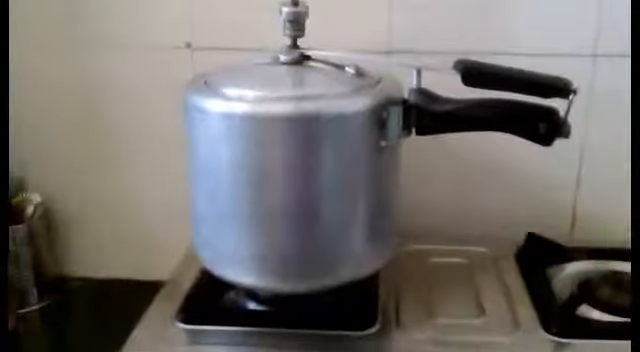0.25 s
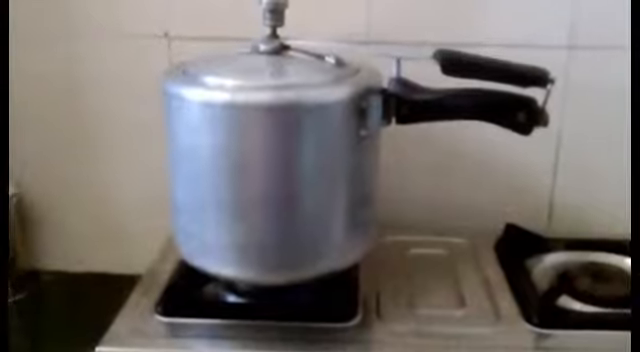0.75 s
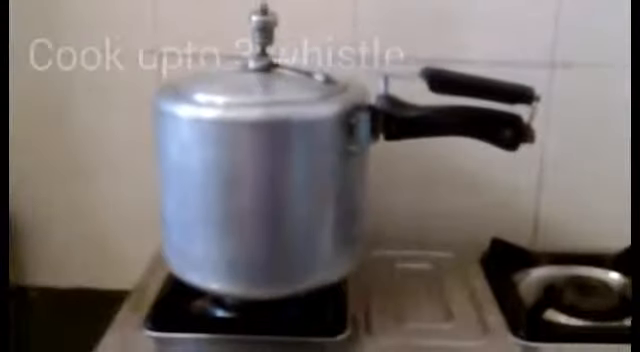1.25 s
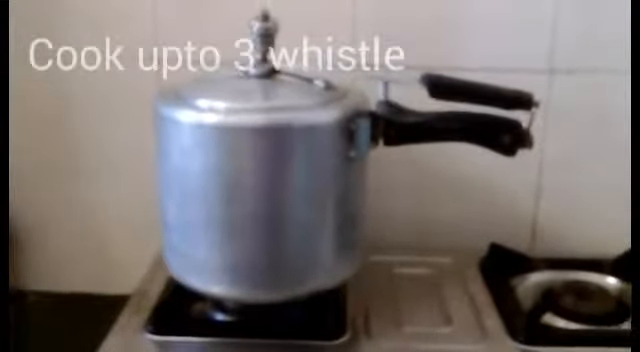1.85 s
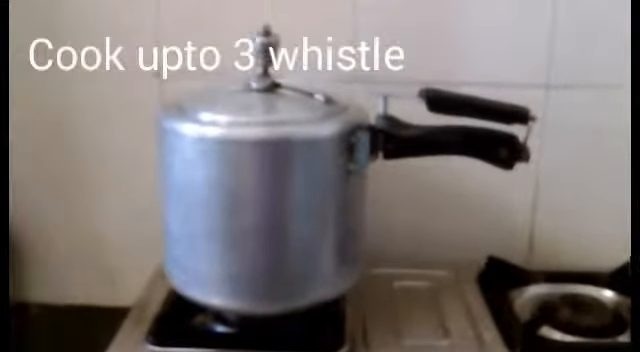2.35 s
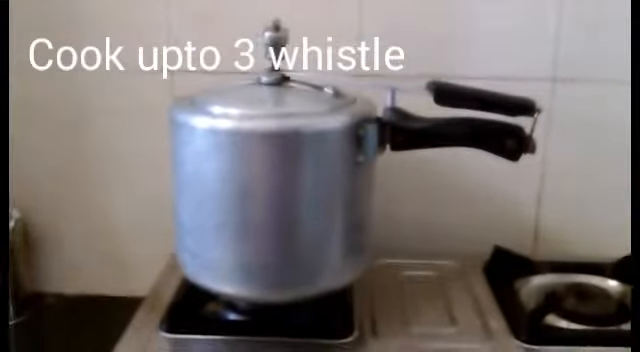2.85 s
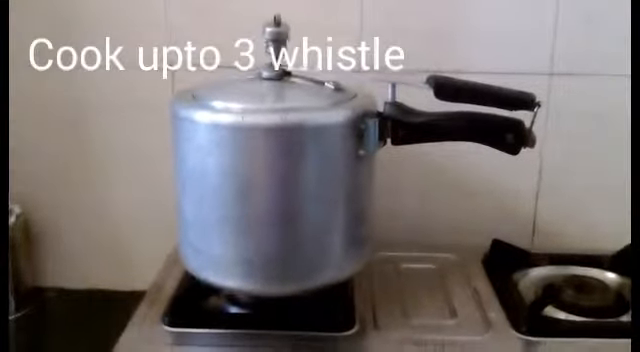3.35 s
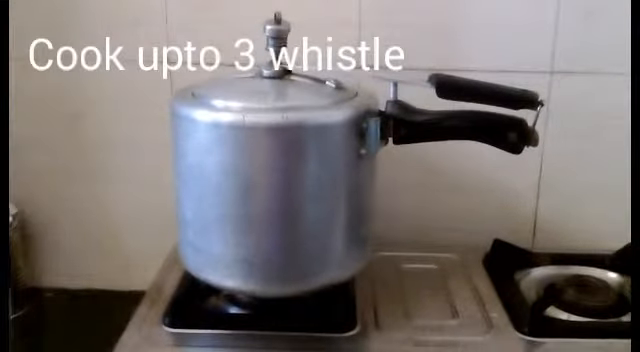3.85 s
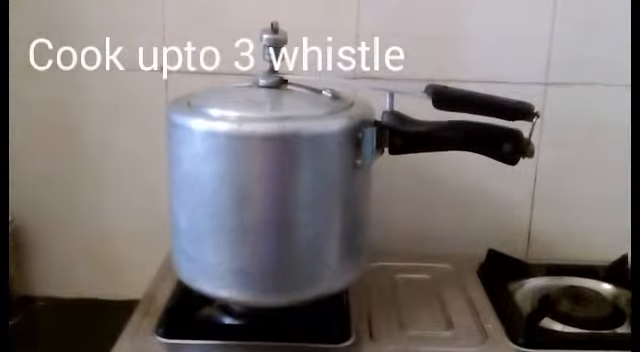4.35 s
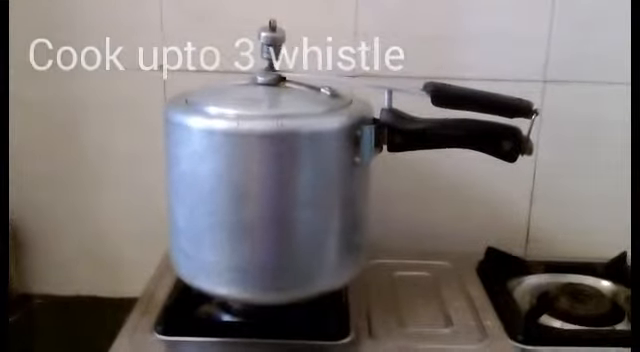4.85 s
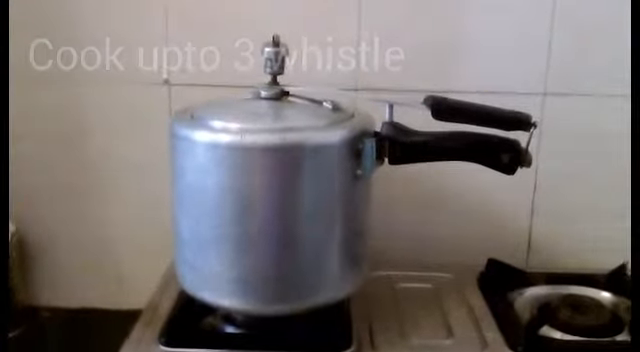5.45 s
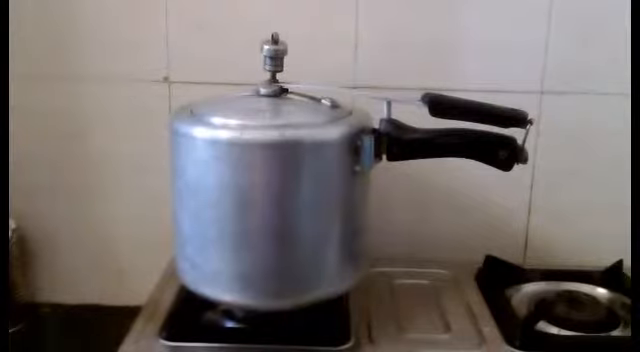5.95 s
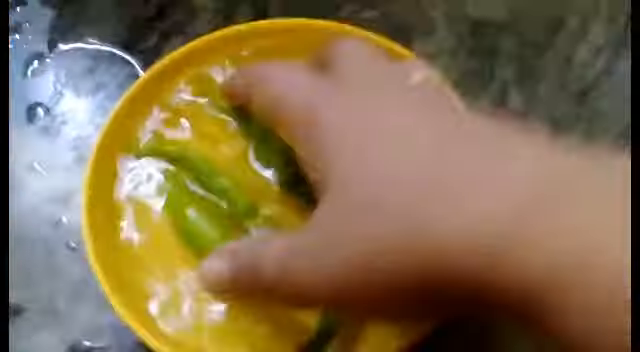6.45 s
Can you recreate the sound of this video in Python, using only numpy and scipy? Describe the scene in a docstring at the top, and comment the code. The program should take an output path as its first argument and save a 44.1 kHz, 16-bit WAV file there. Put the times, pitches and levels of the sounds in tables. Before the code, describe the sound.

After a tiny silence, pressurised steam roars out in one constant sharp hiss, barely wavering, close and harsh, until an abrupt cut.

```python
"""Steam blows steadily past the lifted weight of a pressure cooker in a small tiled kitchen.
The jet is shaped turbulent noise, lifted at the drifting cavities of vent tube and weight.
The tiles throw it back as a few near echoes and a short tail that changes as the microphone moves.
It overloads a hand-held mono microphone; after a brief silence it fades in fast, and it is cut off sharply."""
import sys
import numpy as np
from scipy import signal
from scipy.io import wavfile
from scipy.ndimage import uniform_filter1d

SR = 44100
rng = np.random.default_rng(int(sys.argv[2]) if len(sys.argv) > 2 else 0)


def dump_mix(stems):
    """Bounce the given channels to the path in sys.argv[1] as a 16-bit WAV at rate SR."""
    frames = np.atleast_2d(stems).T  # one column per channel
    limited = np.clip(frames, -1, 1)  # hard clip at full scale
    pcm = np.round(limited * 32767).astype(np.int16)
    wavfile.write(sys.argv[1], SR, pcm)


N = 296031

JET_RMS_DB = -8  # steady flow; level before overload
TREBLE_FROM_HZ = 7000  # the lift grows over the octave above
# Treble lift of the hiss, dulling slowly then brightening: (time [s], lift [dB])
TREBLE_LIFT = [(.2, 1), (2.5, .5), (4.1, -1), (5.3, 1), (5.7, 0.5)]
# Broad turbulence spectrum: (frequency [Hz], density [dB per Hz])
JET_SPECTRUM = [(25, -42), (380, -32.5), (950, -25.5), (1300, -17.5), (2000, -11), (2400, -5), (3050, -2.5),
                (3300, -6.5), (3700, -3.5), (5700, -2.5), (7900, -5.5), (10600, -9.5), (11800, -11.5),
                (13800, -13.5), (15500, -13)]
# Vent tube and weight cavities:
# (centre [Hz], width [Hz], level over the jet [dB], drift [share of centre])
VALVE_CAVITIES = [(2960, 450, -0.5, 0.0092), (4970, 510, 1, .02), (6355, 490, 7.5, .004),
                  (10060, 1400, 3, 0.012), (12500, 900, -2.5, .02)]


def jet(patchy_db=0.46, sway_db=0.72, flutter_db=0.16):
    """Turbulent noise, lifted at the drifting valve cavities, with eddies as faint patches."""
    fft_size, hop = 512, 128
    frames, hz = N // hop + 8, np.fft.rfftfreq(fft_size, 1 / SR)
    t = np.arange(frames) * hop / SR
    real, imag, patches, sway = rng.standard_normal((frames, len(hz), 4)).T

    # the aim drifts, so does the colour
    sway = smoothed_field(sway, bins=6, frames=400)
    patches = smoothed_field(patches, bins=8, frames=30)
    spectrum_hz, spectrum_db = np.transpose(JET_SPECTRUM)
    broad_db = np.interp(np.log(hz + 1), np.log(spectrum_hz), spectrum_db)
    field_db = broad_db[:, None] + patchy_db * patches + sway_db * sway

    lift_s, lift_db = np.transpose(TREBLE_LIFT)
    treble_share = np.clip(np.log2((hz + 1) / TREBLE_FROM_HZ), 0, 1)
    field_db += np.outer(treble_share, np.interp(t, lift_s, lift_db))

    power = np.ones_like(field_db)
    for centre_hz, width_hz, over_jet_db, drift in VALVE_CAVITIES:
        drifting_hz = centre_hz * (1 + drift * wander(t, .1, 2.5))
        detuning = (hz[:, None] - drifting_hz) / (width_hz / 2)
        power += gain_of(2 * over_jet_db) / (1 + detuning ** 2)  # doubled dB: power ratio

    flutter = flutter_db * wander(t, 2.5, 25)  # the weight wobbles
    spectrogram = (real + 1j * imag) * np.sqrt(power) * gain_of(field_db + flutter)
    hiss = signal.istft(spectrogram, nperseg=fft_size, noverlap=fft_size - hop)[1][:N]
    return evened(hiss)


# Reflections off lid, hob and tiles: (delay [ms], level [dB])
NEAR_ECHOES = [(1.8, -32), (4.4, -19), (9.6, -18), (10.8, -21.5)]


def kitchen(x, wet_db=-7, top_wet_db=-8.5, split_hz=7000):
    """Near echoes plus tail; short waves lose their pattern sooner when the microphone moves."""
    near = np.zeros(SR // 20)
    near[0] = 1  # direct sound
    for delay_ms, level_db in NEAR_ECHOES:
        near[round(delay_ms * SR / 1000)] += gain_of(level_db)
    low = signal.oaconvolve(x, signal.firwin(255, split_hz, fs=SR), "same")
    low_tail = gain_of(wet_db) * drifting_tail(low, t60_s=.3, count=4)
    top_tail = gain_of(top_wet_db) * drifting_tail(x - low, t60_s=.15, count=12)
    return evened(signal.oaconvolve(x, near)[:N] + (low_tail + top_tail))


def drifting_tail(x, t60_s, count):
    """Dense decaying reverberation; as the hand drifts, each tail turns into the next."""
    t = np.arange(SR // 3) / SR
    envelope = gain_of(-60 * t / t60_s) * np.minimum(t / 0.0053, 1)  # 5.3 ms onset
    tails = rng.standard_normal((count, len(t))) * envelope
    tails /= np.linalg.norm(tails, axis=1)[:, None]
    away = np.linspace(0, count - 1, N) - np.arange(count)[:, None]
    windows = np.cos(np.pi / 2 * np.clip(away, -1, 1))  # squares sum to 1
    wet = signal.oaconvolve(x[None], tails, axes=1)[:, :N]
    return (wet * windows).sum(0)


def gain_of(db):
    """Decibels to amplitude gain."""
    return 10 ** (np.asarray(db) / 20)


def evened(x):
    """Scales to rms 1."""
    return x / np.sqrt(np.mean(x ** 2) + 1e-20)


def smoothed_field(noise, bins, frames):
    """Noise averaged over frequency bins and time frames, at rms 1."""
    across_hz = uniform_filter1d(noise, size=bins, axis=0)
    return evened(uniform_filter1d(across_hz, size=frames, axis=1))


def wander(t, low_hz, top_hz, count=24):
    """Slow chance at rms 1: sines of random phase, the slower ones stronger."""
    return evened(sum(np.sin(2 * np.pi * (f * t + rng.random())) / np.sqrt(f)
                      for f in np.geomspace(low_hz, top_hz, count)))


def scene():
    """The jet in the kitchen, the same in both channels."""
    return np.tile(gain_of(JET_RMS_DB) * kitchen(jet()), (2, 1))


CEILING = .87  # converter overload, share of full scale
START_S, FADE_S, STOP_S = .1148, .017, 6.2487
BAND_LIMIT_HZ = 15480


def record(dry):
    """The converter clips the peaks; then a quick fade in, a hard cut and the band limit."""
    clipped = np.clip(dry, -CEILING, CEILING)
    t = np.arange(N) / SR
    fade_in = np.sin(np.pi / 2 * np.clip((t - START_S) / FADE_S, 0, 1))
    gate = fade_in * (t < STOP_S)
    lowpass = signal.firwin(1535, BAND_LIMIT_HZ, window=("kaiser", 9), fs=SR)
    return signal.oaconvolve(clipped * gate, lowpass[None], "same")


dry = scene()
out = record(dry)
dump_mix(out)
```